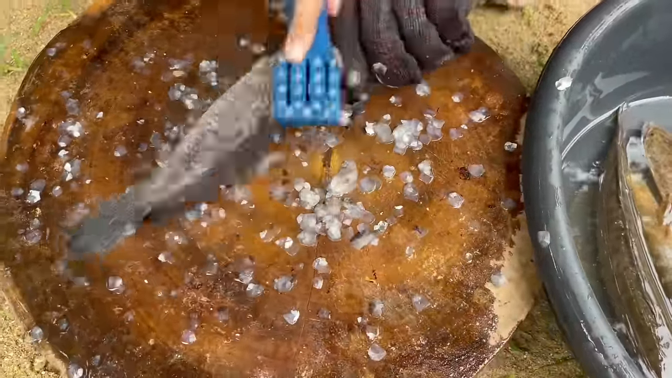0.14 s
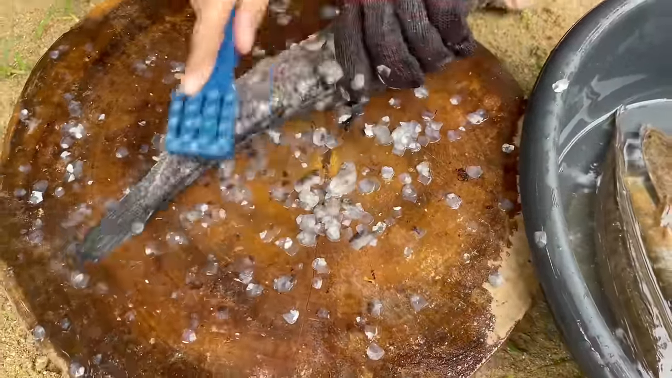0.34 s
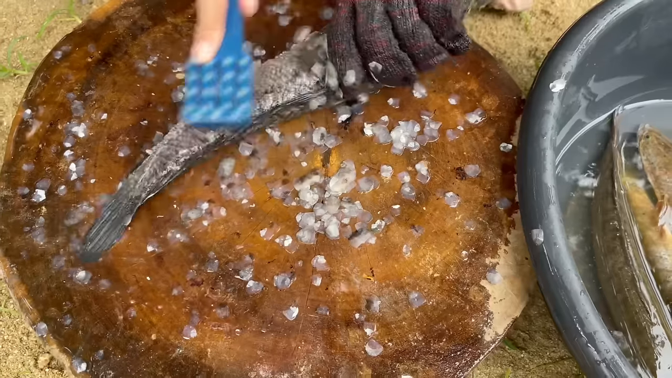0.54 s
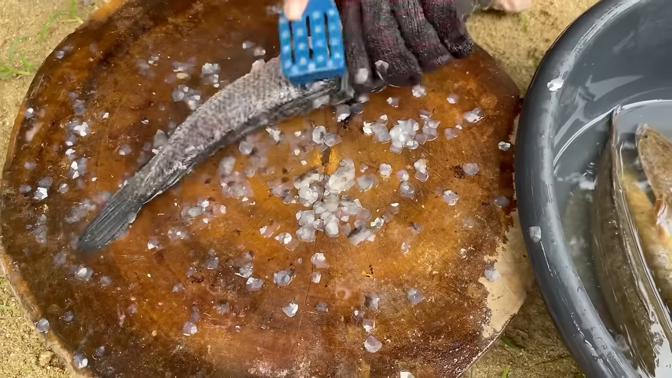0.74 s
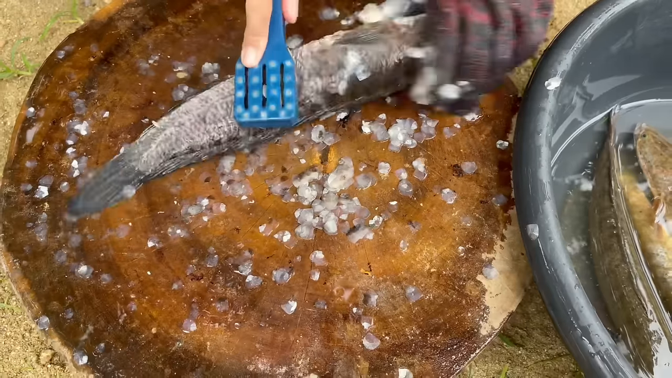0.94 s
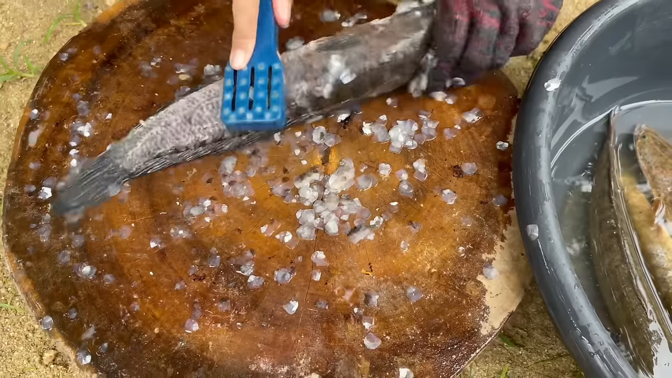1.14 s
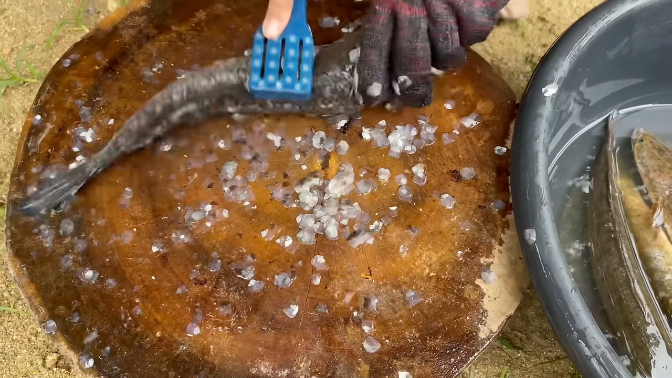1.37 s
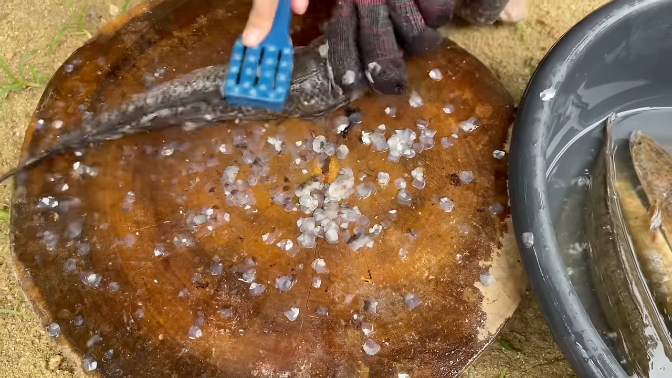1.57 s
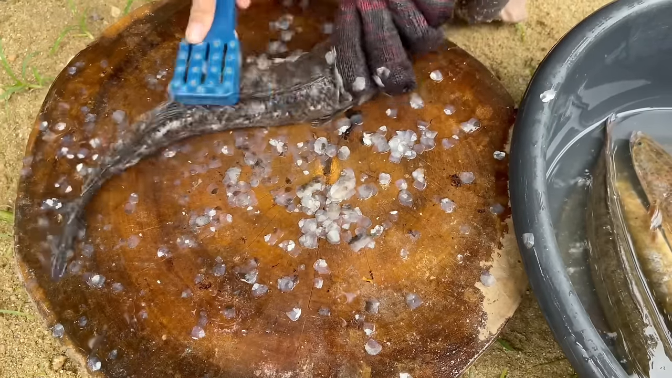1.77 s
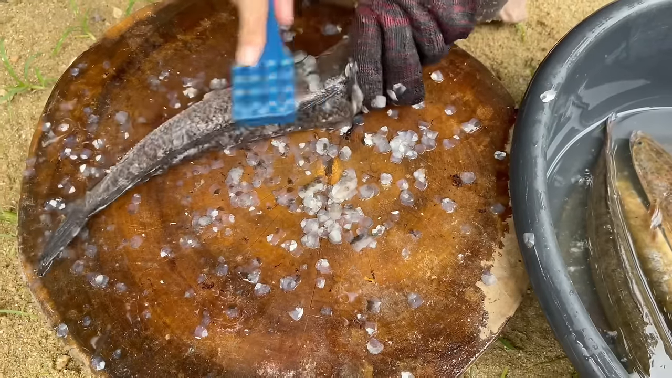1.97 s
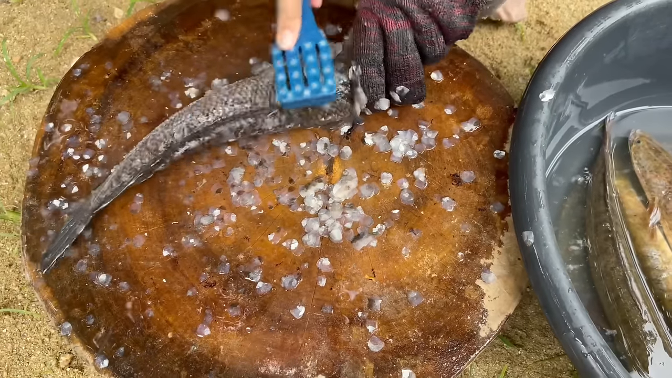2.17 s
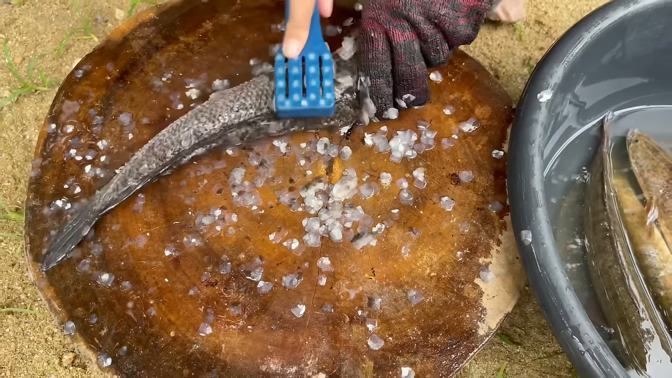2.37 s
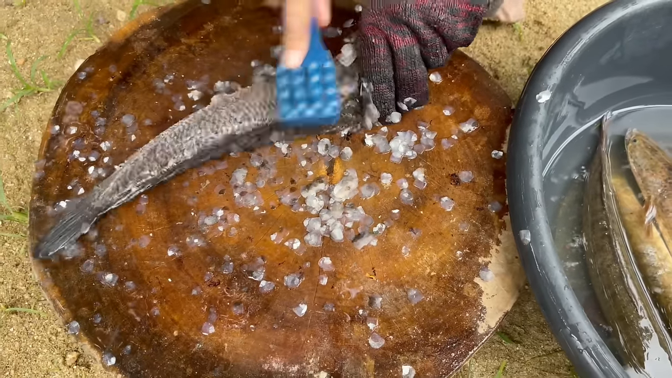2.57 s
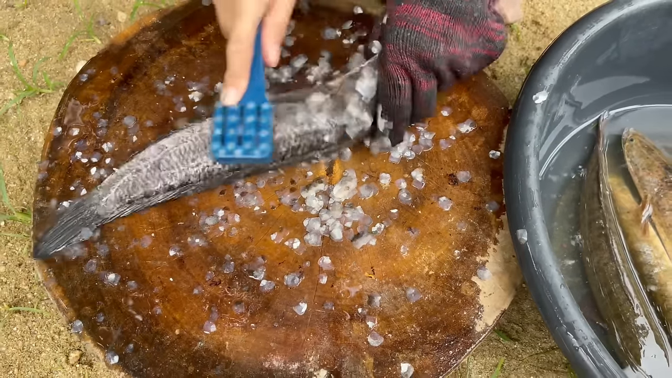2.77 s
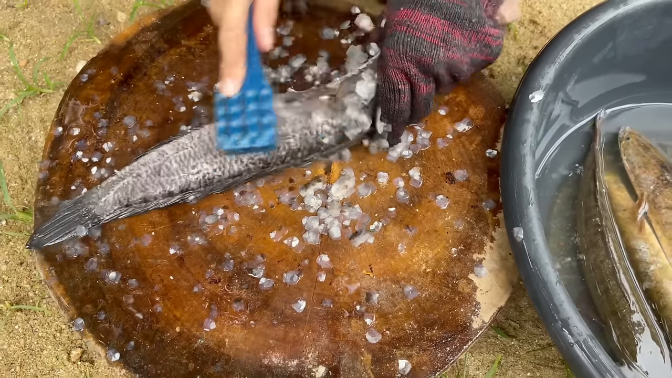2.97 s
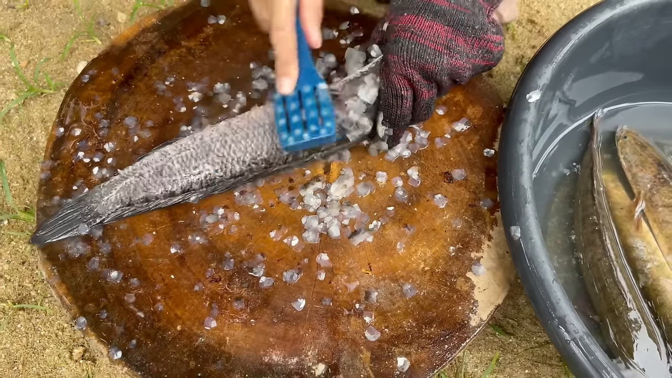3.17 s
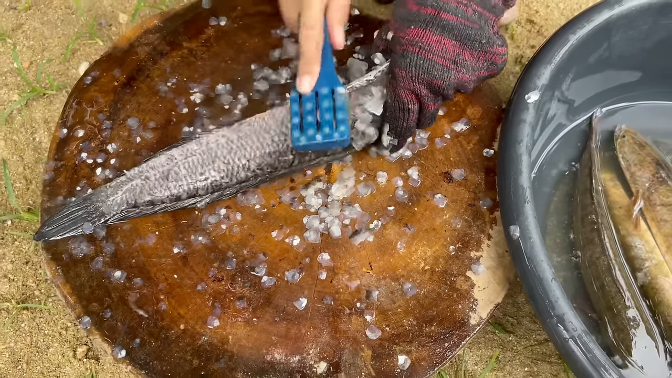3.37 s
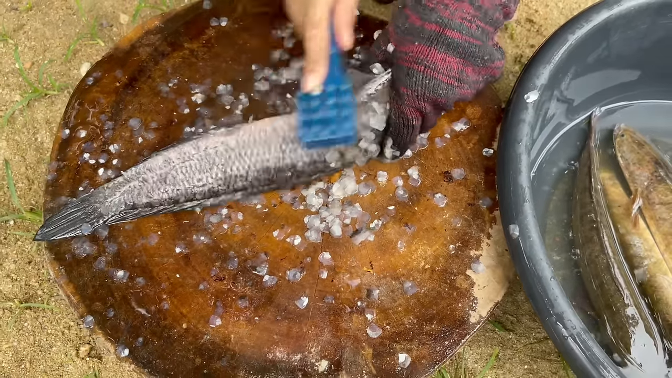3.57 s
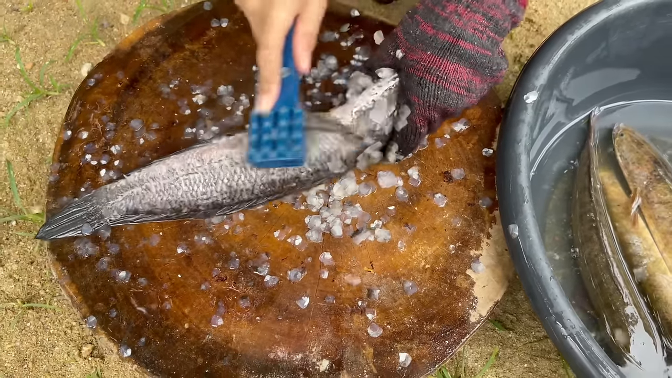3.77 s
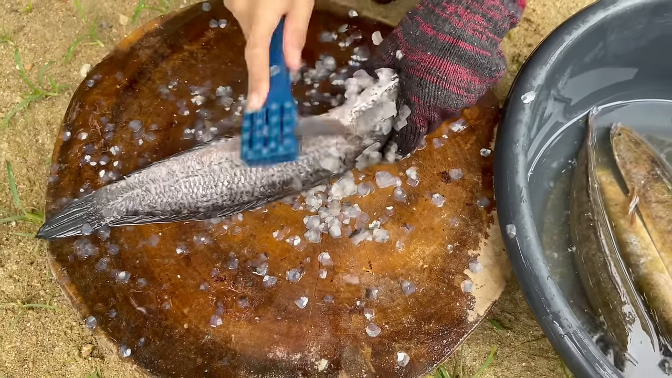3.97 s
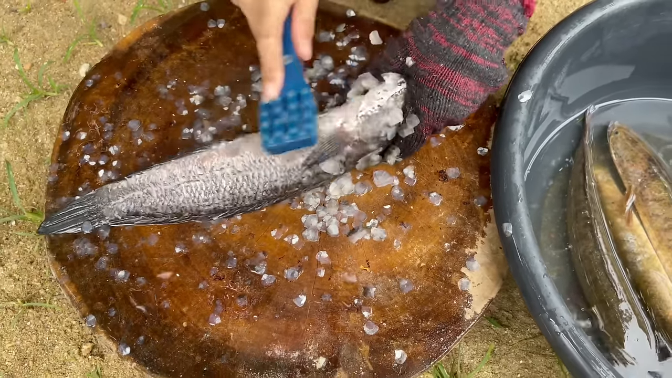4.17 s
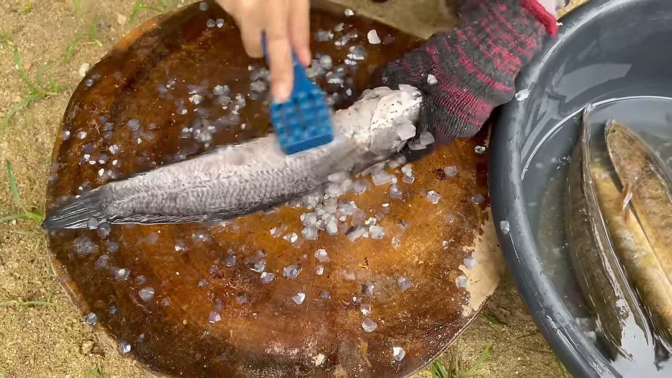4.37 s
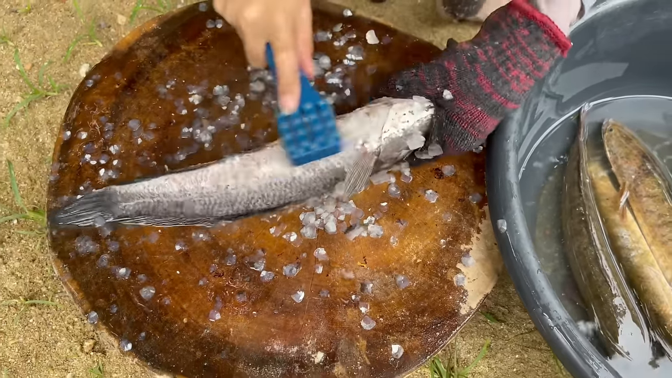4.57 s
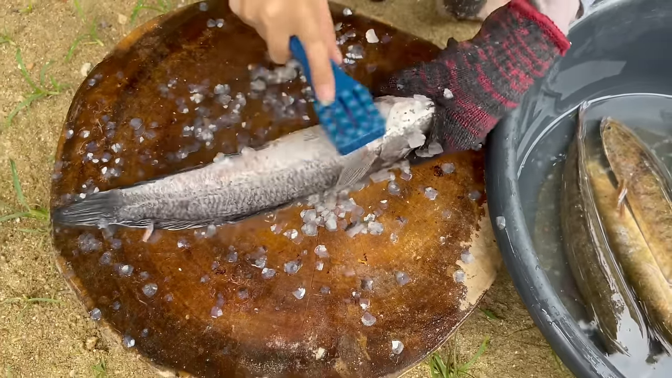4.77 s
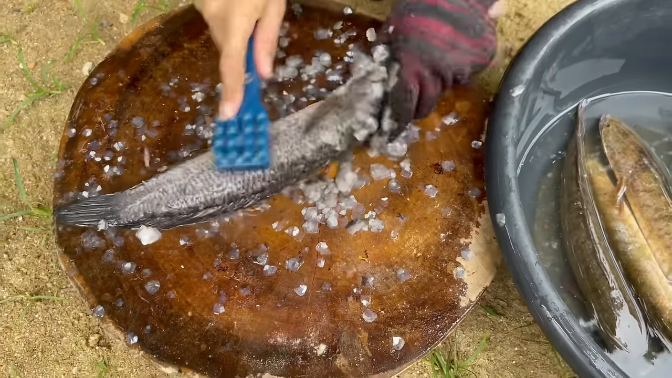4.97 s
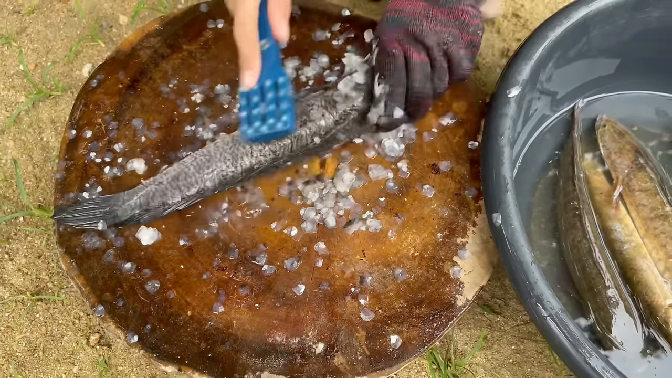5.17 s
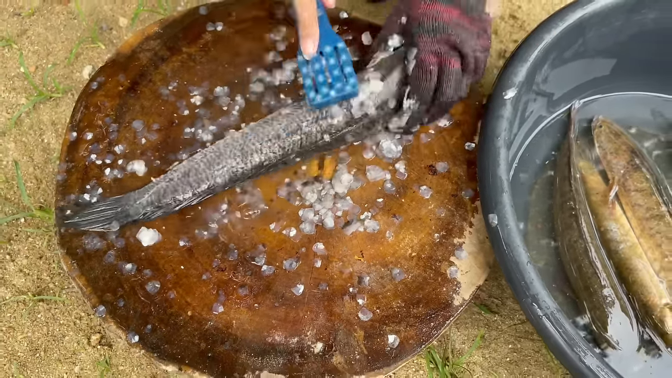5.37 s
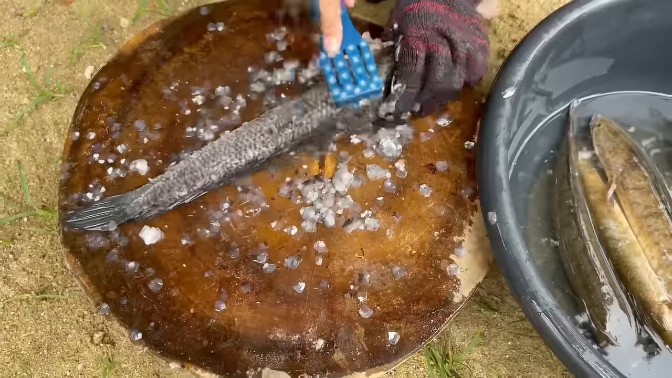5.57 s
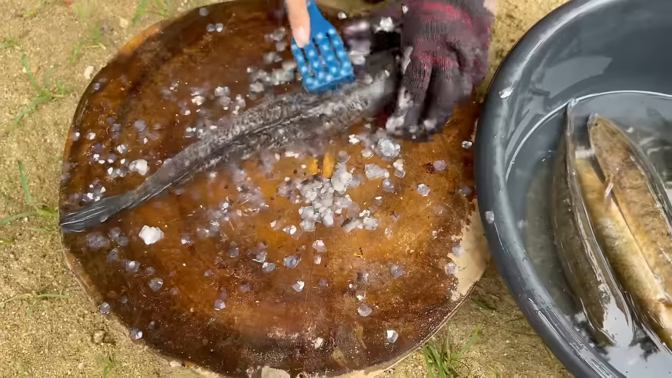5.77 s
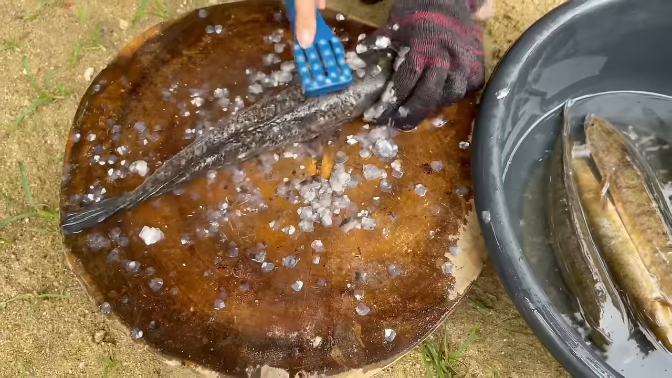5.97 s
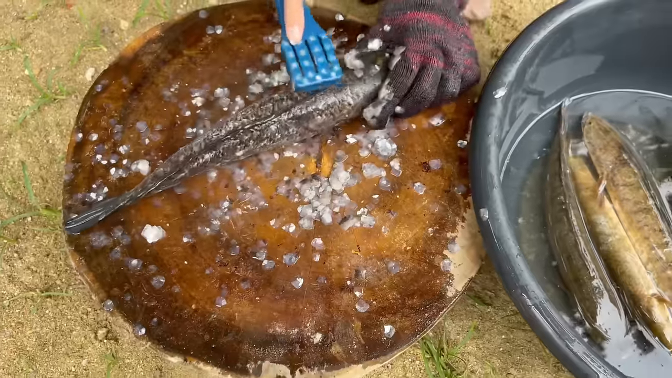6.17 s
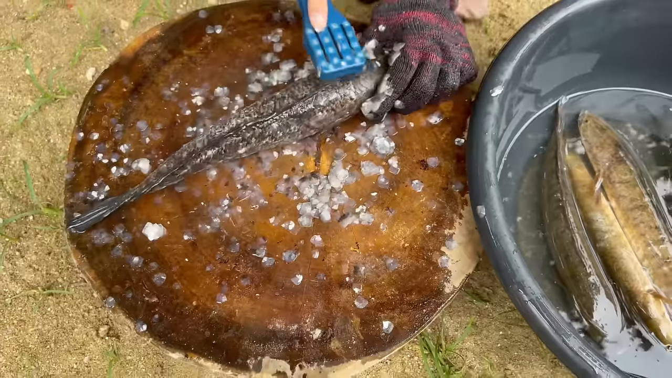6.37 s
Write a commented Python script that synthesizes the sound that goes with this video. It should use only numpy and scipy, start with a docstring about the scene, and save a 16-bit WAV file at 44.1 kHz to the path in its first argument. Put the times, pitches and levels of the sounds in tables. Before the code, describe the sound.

Close to the microphone, a plastic scaler scrapes a wet fish on a heavy wooden block in quick uneven strokes, about four hard pushes a second with lighter returns. Scales rasp, crackle and snap, the flesh thrums dully, and bits tick down. After five seconds the strokes grow softer and sparser. Insects shrill steadily in the open air over a low rumble.

```python
"""Outdoors, a plastic scaler works over a fish on a thick wooden block: hard pushes, lighter returns.
Stick-slip friction at the teeth drives coloured noise: tearing scales rasp and crackle, the fish thrums.
Stubborn scales snap in short bursts, the scaler's head pings in damped modes, loose scales tick down.
The block thuds under the strokes. Behind lie shrill insects, a low rumble and faint far-off whistles,
all made from filtered noise except the whistles, which are gliding sines."""
import sys
import numpy as np
from scipy import signal
from scipy.fft import rfft, irfft, next_fast_len
from scipy.io import wavfile
from scipy.ndimage import uniform_filter1d

SR = 44100
rng = np.random.default_rng(int(sys.argv[2]) if len(sys.argv) > 2 else 0)


def wrap_up_sound(samples):
    """Save the sound to the file named by the first command line argument, as 16-bit audio."""
    columns = np.atleast_2d(samples).T
    # keep every value between -1 and 1, then stretch to whole-number steps
    tamed = np.clip(columns, -1, 1)
    steps = np.round(tamed * 32767).astype(np.int16)
    wavfile.write(sys.argv[1], SR, steps)


N = 283563
T = np.arange(N) / SR


def amp(db):
    """Decibel law: a level becomes an amplitude gain."""
    return 10 ** (np.asarray(db) / 20)


def read(points, hz):
    """Log-frequency interpolation: every column of a table, joined by straight lines."""
    f, *columns = np.transpose(points)
    return [np.interp(np.log(hz + 1), np.log(f + 1), c) for c in columns]


def curves(rows):
    """Linear interpolation in time: every column of a table, joined by straight lines."""
    s, *columns = np.transpose(rows)
    return [np.interp(T, s, c) for c in columns]


def smooth(x, seconds):
    """Lowpass by moving average."""
    return uniform_filter1d(x, max(1, int(seconds * SR)), axis=-1)


def wander(seconds):
    """Low-frequency random modulation: twice-smoothed noise of unit spread."""
    x = smooth(smooth(rng.standard_normal(N), seconds), seconds)
    return x / x.std()


def noise():
    """Incoherent sources: two unrelated white noises."""
    return rng.standard_normal((2, N))


def clicks(per_s, spread_db):
    """Random impulses: the same moments in both drives, most small and a few large."""
    size = amp(spread_db * np.minimum(rng.exponential(1, N), 4.5))
    happens = rng.random(N) < per_s / SR
    return size * happens * noise()


def patchy(x, patch_db, width_hz, seconds):
    """Time-varying spectrum: random patches in time and frequency keep the colour shifting."""
    window, hop = 512, 128
    z = signal.stft(x, nperseg=window, noverlap=window - hop)[2]
    field = rng.standard_normal(z.shape[1:])
    for axis, span in 2 * [(0, width_hz * window / SR), (1, seconds * SR / hop)]:
        field = uniform_filter1d(field, max(1, round(span)), axis)
    gain = amp(patch_db * field / field.std())
    y = signal.istft(z * gain, nperseg=window, noverlap=window - hop)[1][:, :N]
    return y / y.std()


def steadied(x, seconds):
    """Envelope normalisation: evens out the slow level and keeps the fine grain."""
    power = smooth(smooth((x ** 2).mean(0), seconds), seconds)
    return x / np.sqrt(abs(power) + 1e-6)


def repitched(x, factor):
    """Variable-rate resampling: scales every frequency by a factor that moves in time."""
    at = np.cumsum(factor) % (N - 1)
    return np.array([np.interp(at, np.arange(N), port) for port in x])


# the two microphone ports:
# (frequency [Hz], likeness [0-1], lead of the left [rad], left over right [dB])
PORT_PAIR = [(60, .98, 0, 1.3), (500, .98, .08, 3), (1100, .92, .15, 3), (2200, .7, .2, 3),
             (3500, .78, 1.15, 3.5), (4200, .5, 1.2, 4), (4800, .3, -.5, 4.5), (5800, .7, 0, 3),
             (7100, .45, .4, .5), (8500, .96, 0, 0), (8950, .8, -.3, 0), (9500, .85, -1.9, 0),
             (10200, .98, -3.1, 0), (11650, .95, -6.1, 0), (12600, .93, -6.45, 0), (16000, .6, -6.4, 0)]


def heard(drive, spectrum):
    """Partial coherence: colours two drives and mixes them into two ports at unit rms."""
    size = next_fast_len(N, real=True)
    hz = np.fft.rfftfreq(size, 1 / SR)
    octaves_outside = abs(np.log2((hz + 1) / np.clip(hz + 1, spectrum[0][0], spectrum[-1][0])))
    colour = amp(read(spectrum, hz)[0] - 20 * octaves_outside)  # 20 dB per octave beyond the table
    a, b = rfft(drive, size) * colour
    same, lead, side_db = read(PORT_PAIR, hz)
    same = np.clip(same, 0, 1)
    right = (same * a + np.sqrt(1 - same ** 2) * b) * np.exp(-1j * lead)
    x = irfft(np.array([a * amp(side_db / 2), right * amp(-side_db / 2)]), size)[:, :N]
    return x / x.std()


def stroke(start, length, level_db, peak):
    """Pressure arch: force swells to a peak part of the way through a stroke and eases off."""
    ends_db, arch_power = -15, 2.1  # level at both ends below the peak, flatness of the top
    out = np.zeros(N)
    near = slice(max(0, int((start - length) * SR)), int((start + 2 * length) * SR))
    along, peak = (T[near] - start) / length, np.clip(peak, .1, .9)
    from_peak = np.maximum((peak - along) / peak, (along - peak) / (1 - peak))
    out[near] = amp(level_db + ends_db * from_peak ** arch_power)
    return out


# lighter return strokes:
# (start [s], length [s], relative thrum of the fish [dB], relative rasp of the scales [dB])
RETURN_STROKES = [(0, 0.058, -46, -33), (0.197, 0.075, -45.5, -30.5), (0.482, 0.061, -45.5, -34),
                  (0.823, 0.11, -44, -30.5), (1.227, 0.05, -29.5, -33.5), (1.434, 0.035, -49.5, -33.5),
                  (1.538, 0.095, -46, -28.5), (1.645, 0.091, -51, -28.5), (1.947, 0.059, -48, -30.5),
                  (2.194, 0.052, -43, -26.5), (2.428, 0.067, -39.0, -30.0), (2.734, 0.035, -39.5, -22.5),
                  (2.938, 0.063, -38.5, -30), (3.193, 0.06, -32, -25.5), (3.439, 0.077, -38.0, -30),
                  (3.681, 0.097, -31.5, -26), (3.889, 0.107, -29, -25), (4.152, 0.074, -31, -31.5),
                  (4.369, 0.073, -28.5, -30.5), (4.485, 0.064, -43, -26.5), (4.802, 0.11, -28, -28),
                  (5.62, 0.17, -51, -41), (5.855, 0.044, -45.5, -51)]


def returning(thrum_db=.5, rasp_db=-3.5):
    """Friction drive under light pressure: a return rasps first and thrums later."""
    thrum_peak, rasp_peak = 0.608, 0.2  # fractions of the stroke
    thrum = sum(stroke(s, length, db + thrum_db, thrum_peak) for s, length, db, _ in RETURN_STROKES)
    rasp = sum(stroke(s, length, db + rasp_db, rasp_peak) for s, length, _, db in RETURN_STROKES)
    return np.array([thrum, rasp])


def sagging():
    """Pitch glide: the flank thrums higher as a stroke sets in and sinks as the teeth press on."""
    sag_hz = 59.3  # slope through mid-stroke, Hz per stroke length
    offset = np.zeros(N)
    for s, length, *_ in PUSH_STROKES + RETURN_STROKES:
        near = slice(max(0, int((s - length) * SR)), int((s + 2 * length) * SR))
        along = (T[near] - s) / length - .5
        offset[near] -= sag_hz * along * np.exp(-along ** 2)
    return offset


# between strokes the scaler and the glove still brush the wet skin: (thrum [dB], rasp [dB])
SKIN_BRUSH = (-62, -47)


def effort():
    """Power addition: strokes and brushing sum to thrum and rasp amplitudes and a pitch in Hz."""
    return_hz = 599.4  # the flank thrums higher under a light return
    (push, push_hz), back = pushing(), returning()
    thrum, rasp = np.sqrt(push ** 2 + back ** 2 + amp(SKIN_BRUSH)[:, None] ** 2)
    return_share = (back[0] / thrum) ** 2
    pitch = push_hz + (return_hz - push_hz) * return_share + sagging()
    return thrum, rasp, pitch


def tearing(tears_per_s=1700, decay_s=.001):
    """Granular noise: each scale rips loose in a tiny burst, and the bursts overlap into a rasp."""
    rips = rng.exponential(1, N) * (rng.random(N) < tears_per_s / SR)
    power = signal.lfilter([1], [1, -np.exp(-2 / (decay_s * SR))], rips)
    return np.sqrt(power) * noise()


# the patch being worked:
# (time [s], firmness [0 soft flank - 1 bony back], crispness: crackle over rasp [dB])
WORKED_PATCH = [(.1, 0.99, -1.5), (.4, 0.71, 1.5), (.7, 0.92, 2), (1.3, 0.32, -1), (1.85, 0.78, -1.5),
                (2.2, 0.67, 3.5), (2.6, 0.46, -3), (3.1, 0.051, 2), (3.33, 0.25, -3), (3.6, 0.17, -1),
                (3.85, 0.39, 3), (4.05, .02, 1.5), (4.3, .02, 2.5), (4.62, 0.27, 2.5), (5.02, 0.035, -0.5),
                (5.3, 0.27, 3.5), (5.6, 0.098, 2), (6.3, 0.75, 0)]
# the belly rings hollow when the scaler presses on it: (time [s], level relative to the thrum [dB])
BELLY_RING = [(2.4, -35), (3.1, -10), (4.3, -19), (4.85, -21), (5.02, -9), (5.31, -4.5), (5.7, -2)]
# colour of the soft flank before repitching: (frequency [Hz], relative level [dB per Hz])
FLANK_COLOUR = [(60, -61), (140, -24.5), (300, -21), (390, -12), (460, 1.5), (520, 0.5), (600, -4),
                (700, -11), (850, -18.5), (1100, -26), (1450, -32), (1900, -29), (2600, -25.5), (5000, -61)]
# colour of the bony back: (frequency [Hz], relative level [dB per Hz])
BACK_COLOUR = [(70, -28), (140, -14), (240, -11.5), (310, -8), (390, -9), (510, -2.5), (600, 0),
               (690, -3.5), (790, -3), (880, -3.5), (1050, -15), (1200, -20.5), (1550, -18.5), (1950, -26),
               (2500, -25), (3300, -26), (5400, -11), (7000, -31)]
# colour of the hollow ring: (frequency [Hz], relative level [dB per Hz])
HOLLOW_COLOUR = [(1400, -7), (1750, 1), (1950, 9), (2150, -9), (2450, -9), (3000, -30), (3450, 11),
                 (3800, 6.5), (4100, 6.5), (4700, -31)]
# colour of the rasp at the teeth: (frequency [Hz], relative level [dB per Hz])
RASP_COLOUR = [(300, -18), (900, -3), (1600, -11), (2500, -4.5), (3100, -1), (3550, 4), (4300, 2),
               (5500, 4), (7000, 1.5), (9000, -7), (12000, -53), (16000, -48)]
# colour of the crackling scales: (frequency [Hz], relative level [dB per Hz])
CRACKLE_COLOUR = [(2500, -74), (5000, -58), (7000, -9.5), (8100, 4), (9000, 5), (10000, 8.5), (10800, 10),
                  (11500, 8.5), (12200, -1), (13100, -11), (14300, -47), (15500, -11), (16200, -45)]


def scraping(thrum, rasp, pitch, thrum_db=0, rasp_db=-3, crackle_db=1, catch_db=-0.06):
    """Stick-slip friction: the same slight catches modulate the tearing scales and the fish."""
    flank_hz = 520  # pitch of the flank colour as tabled
    firm, crisp_db = curves(WORKED_PATCH)
    firm = np.clip(firm, 0, 1)
    catches = amp(catch_db * 2 * np.tanh(wander(0.0062) / 2))  # a tooth can hold only so much
    tears = catches * patchy(tearing(), patch_db=2.0, width_hz=520, seconds=.009)
    tugs = patchy(clicks(per_s=3000, spread_db=0.57), patch_db=3.5, width_hz=170, seconds=.02)
    tugs = np.sqrt(catches) * tugs  # the soft flesh evens the catches out
    flank = repitched(heard(tugs, FLANK_COLOUR), pitch / flank_hz)
    fish = steadied((1 - firm) * flank + firm * heard(tugs, BACK_COLOUR), 0.015)
    belly = amp(curves(BELLY_RING)[0]) * steadied(heard(tugs, HOLLOW_COLOUR), 0.018)
    teeth = amp(rasp_db - crisp_db / 2) * steadied(heard(tears, RASP_COLOUR), 0.027)
    scales = amp(crackle_db + crisp_db / 2) * steadied(heard(tears, CRACKLE_COLOUR), 0.033)
    return amp(thrum_db) * thrum * (fish + belly) + rasp * (teeth + scales)


def flakes(rasp, level_db=-47):
    """Random impacts: loose wet scales tick as they land, more strongly just after a strong rasp."""
    shed = signal.lfilter([1], [1, -np.exp(-1 / (.18 * SR))], rasp)  # fades over 0.18 s
    landing = clicks(per_s=150, spread_db=7.5) * (1 + shed / shed.mean())
    t = T[:400]
    splat = rng.standard_normal(len(t)) * np.exp(-t / 0.0041)
    ticks = signal.oaconvolve(landing, splat[None], axes=1)[:, :N]
    return amp(level_db) * heard(ticks, CRACKLE_COLOUR)


# the block rocks on the ground: (start [s], length [s], peak level [dB])
BLOCK_ROCKINGS = [(2.836, 0.076, -44), (3.609, 0.11, -37), (4.101, 0.13, -39.5)]
# colour of its thud: (frequency [Hz], relative level [dB per Hz])
THUD_COLOUR = [(25, -35), (45, -16), (62, 2.5), (110, -23), (170, -13), (300, -40), (600, -70)]


def block(rasp, level_db=-20, settle=0.045):
    """Inertia of a heavy mass: it thuds softly, following the strokes smoothed over settle seconds."""
    keep = np.exp(-1 / (settle * SR))
    push = signal.lfilter([1 - keep], [1, -keep], rasp)
    rocking = sum(stroke(s, length, db, 0.39) for s, length, db in BLOCK_ROCKINGS)
    return (amp(level_db) * push + rocking) * steadied(heard(noise(), THUD_COLOUR), 0.021)


# calls of the nearest insect: (start [s], end [s], level [dB])
INSECT_CALLS = [(0.46, 1.093, -39.5), (1.683, 2.229, -41.5), (2.945, 3.5, -45), (4.193, 4.522, -42),
                (4.913, 5.33, -41.5), (5.695, 6.141, -38.5)]
# colour of the distant chorus: (frequency [Hz], relative level [dB per Hz])
CHORUS_COLOUR = [(5000, -39), (5900, -32), (6350, -21), (6850, -11.5), (7500, -16.5), (8200, -20),
                 (9000, -24), (9800, -107), (11100, -38), (12300, -35), (13200, -53)]
# colour of the nearest insect: (frequency [Hz], relative level [dB per Hz])
SHRILL_COLOUR = [(5600, -50), (6050, -18), (6220, -4), (6330, -28), (6440, 0), (6560, -8), (7000, -42)]


def insects(chorus_db=-41, waver_db=2.36, fade_s=0.027):
    """Narrow-band noise: an unbroken, wavering distant chorus, and a nearer insect shrilling in calls."""
    calls = sum(amp(db) * np.clip(np.minimum(T - start, end - T) / fade_s, 0, 1)
                for start, end, db in INSECT_CALLS)
    chorus = amp(chorus_db + waver_db * wander(0.019)) * heard(noise(), CHORUS_COLOUR)
    return chorus + calls * heard(noise(), SHRILL_COLOUR)


# colour of the open air: (frequency [Hz], relative level [dB per Hz])
AIR_COLOUR = [(15, -52), (30, -41), (48, -1.5), (62, 0), (80, 0), (105, -0.5), (150, -9.5), (220, -10.5),
              (330, -18), (700, -24), (1250, -25), (2400, -26.5), (3800, -29), (5500, -53), (12000, -67),
              (16000, -62)]


def air(level_db=-45, swell_db=1):
    """Ambient noise: a low outdoor rumble with a thin, drifting wash of far-off sound."""
    drift = patchy(noise(), patch_db=2.0, width_hz=200, seconds=0.16)
    return amp(level_db + swell_db * wander(0.57)) * steadied(heard(drift, AIR_COLOUR), 0.17)


# pushes against the lay of the scales: (start [s], length [s], relative thrum of the fish [dB],
# relative rasp of the scales [dB], place of the rasp peak [0-1 of the stroke], flank pitch mid-push [Hz])
PUSH_STROKES = [(0.089, 0.064, -17.5, -18.5, 0.53, 550.5), (0.341, 0.097, -17, -20.5, 0.54, 541.7),
                (0.633, 0.076, -15, -18.5, 0.44, 556.7), (1.28, 0.11, -39, -26, 0.4, 533),
                (1.823, 0.053, -32, -23, 0.5, 552.6), (1.878, 0.053, -63, -22.5, 0.26, 557),
                (2.056, 0.084, -29, -16.5, 0.5, 560), (2.304, 0.059, -26.5, -17.5, 0.38, 558),
                (2.533, 0.081, -24.5, -16.5, 0.64, 562.3), (2.786, 0.11, -27, -19, 0.47, 510.8),
                (3.041, 0.066, -19, -15, 0.98, 513.6), (3.284, 0.061, -22.5, -19.5, 0.78, 509.7),
                (3.533, 0.0582, -18.5, -17, 0.65, 542.3), (3.796, 0.043, -25, -21.5, 0.7, 565),
                (3.842, 0.033, -29, -20, 0.65, 563.5), (4.019, 0.05, -22.5, -25, 0.22, 545),
                (4.254, 0.05134, -24, -30.5, 0.24, 528), (4.556, .1, -29.5, -32, 0.21, 562),
                (4.966, 0.11, -25, -27, 0.42, 523), (5.257, .12, -33, -34.5, 0.4, 521.5),
                (5.559, 0.041, -40.5, -24.5, 0.01, 538.2), (5.971, 0.033, -41, -32.5, 0.18, 550),
                (6.254, 0.04, -45, -26, 0, 534), (6.364, 0.02, -47.5, -30.5, 0.6, 550)]


def pushing(thrum_db=1, rasp_db=0):
    """Friction drive under hard pressure: thrum and rasp amplitudes, and the flank's pitch in Hz."""
    thrum_peak = 0.343  # a push thrums early
    thrum = sum(stroke(s, length, db + thrum_db, thrum_peak) for s, length, db, _, _, _ in PUSH_STROKES)
    rasp = sum(stroke(s, length, db + rasp_db, peak) for s, length, _, db, peak, _ in PUSH_STROKES)
    pitch = curves([(s + length / 2, hz) for s, length, *_, hz in PUSH_STROKES])[0]
    return np.array([thrum, rasp]), pitch


# stubborn scales letting go: (time [s], relative knock on the fish [dB],
# relative clack of the tooth [dB], relative crack of the scale [dB])
SCALE_SNAPS = [(0.09, -35, -37, -17.5), (0.101, -24, -24, -9), (0.1421, -6.5, -5.5, -2),
               (0.158, -46, -23, -23), (0.345, -37, -34, -15), (0.427, -27, -25, -9),
               (0.44, -31, -13.5, -6), (0.449, -23.5, -21, -11), (0.628, -33, -26.5, -29),
               (0.6948, -26, -14, -8), (0.7033, -12.5, -11, -1), (1.214, -32, -46, -46),
               (1.259, -34, -27, -22), (1.301, -24, -26, -23), (1.313, -26, -31, -24),
               (1.3163, -14, -8.5, -4.5), (1.323, -31, -27, -23), (1.347, -46, -42, -21),
               (1.3633, -28, -19, -13.5), (1.389, -28.5, -23, -22), (1.558, -30.5, -43, -27),
               (1.693, -49, -24, -19), (1.742, -30, -20, -19), (1.8562, -21.5, -22.5, -3),
               (1.888, -42, -20, -20), (1.9052, -20, -13, -13), (1.979, -51, -34, -19),
               (2.133, -14, -9.5, -6.5), (2.137, -18, -15.5, -13), (2.322, -20, -15, -18),
               (2.445, -34, -37, -21.5), (2.579, -12, -22.5, -10), (2.601, -17, -12, -3.5),
               (2.6122, -13.5, -9, -5), (2.6711, -35, -28, -20.5), (2.8075, -20.5, -12.5, -7.5),
               (2.82, -36, -32, -11), (2.834, -36, -22, -19), (2.842, -15, -10, -14),
               (2.849, -16.5, -10, -5), (3.0422, -35, -23, -21), (3.092, -14, -4, 0),
               (3.098, -21, -11, -6.5), (3.103, -30, -5, -13), (3.1912, -35, -34, -18),
               (3.333, -22, -12.5, -6.5), (3.34, -27, -15.5, -19), (3.431, -41, -25.5, -36),
               (3.449, -42, -33.5, -25), (3.462, -36, -42, -21), (3.5897, -13, -11, -1.5),
               (3.6, -13, -12, -7.5), (3.606, -10, -5, -10), (3.6326, -18.5, -14.5, -9),
               (3.6894, -22.5, -31, -7.5), (3.699, -34, -32, -13), (3.8586, -14, -27.5, -24),
               (3.951, -33, -25.5, -20), (4.0215, -26, -27, -25), (4.053, -29.5, -24, -15),
               (4.06, -21, -10.5, -14.5), (4.1174, -58, -40, -26), (4.173, -48.5, -36, -19),
               (4.178, -39, -27.5, -18), (4.29, -25, -29, -16.5), (4.347, -55, -45, -27),
               (4.49, -39, -45, -39), (4.766, -41, -30, -26), (4.8026, -46, -28, -19),
               (4.815, -36, -37, -20), (4.988, -22.5, -23.5, -31), (5.155, -32.5, -37, -42),
               (5.282, -39, -23, -36), (5.3065, -41, -27.5, -21.5), (5.332, -35, -34, -22),
               (5.481, -37.5, -53, -52), (5.571, -31, -18, -13), (5.979, -42, -32.5, -15.5),
               (6.058, -32, -42, -43), (6.0636, -39, -35, -23), (6.2595, -35, -26, -25.5),
               (6.38, -34, -22.5, -30)]
# colour of the knock on the fish: (frequency [Hz], relative level [dB per Hz])
KNOCK_COLOUR = [(250, -3), (450, -7.5), (750, 5.5), (1200, -1), (1700, -5), (2300, -4.5), (3500, -54)]
# colour of the clack of a plastic tooth: (frequency [Hz], relative level [dB per Hz])
CLACK_COLOUR = [(1500, -37), (2400, -12.5), (3100, 4.5), (3700, 6), (4400, 4.5), (5400, 4), (7000, -1.5),
                (12000, -60)]


def snapping(knock_db=-5, clack_db=-5.0, crack_db=-2.0, flutter_db=-12, edge_db=-12):
    """Transient excitation: a scale snaps in a short burst with soft edges, then flutters briefly."""
    rise, decay, flutter, edge = 0.00062, .0023, .007, 0.006  # s
    lead = 256  # samples before the snap sets in
    t = T[:2200] - T[lead]
    snap = np.exp(-(np.maximum(t - rise, 0) / decay) ** 2)
    shape = np.clip(t / rise, 0, 1) * (snap + amp(flutter_db) * np.exp(-t / flutter))
    shape = shape + amp(edge_db) * np.exp(-abs(t) / edge)
    blows = np.zeros((3, N))
    for s, *levels_db in SCALE_SNAPS:
        blows[:, round(s * SR) - lead] = amp(levels_db)
    knock, clack, crack = signal.oaconvolve(blows, shape[None], axes=1)[:, :N]
    burst = patchy(noise(), patch_db=6.5, width_hz=700, seconds=.02)  # each snap has its own colour
    fish = amp(knock_db) * knock * steadied(heard(burst, KNOCK_COLOUR), 0.0059)
    tooth = amp(clack_db) * clack * steadied(heard(burst, CLACK_COLOUR), 0.0028)
    scale = amp(crack_db) * crack * steadied(heard(burst, CRACKLE_COLOUR), 0.005)
    return fish + tooth + scale


# a plastic tooth springs free and pings: (time [s], level [dB], pitch relative to the head modes [ratio])
TOOTH_PINGS = [(0.21, -37.5, 1.13), (3.099, -17, 0.96), (3.689, -24.5, 1.03), (3.704, -29.5, .98),
               (3.862, -21, 1.02), (4.062, -33, 0.94)]
# modes of the scaler's head: (frequency at ratio 1 [Hz], level relative to the ping [dB], t60 [s])
HEAD_MODES = [(3440, 9.5, 0.036), (3570, 0, 0.041), (3960, -8, 0.02), (6370, 0, 0.032)]


def pinging(right_lag=1.05):
    """Modal ringing: the head sounds as damped sines; the right port lags in phase (radians)."""
    t = T[:5000]
    x = np.zeros(N, complex)
    for s, level_db, pitch in TOOTH_PINGS:
        ring = sum(amp(level_db + db - 60 * t / t60) * np.exp(2j * np.pi * hz * pitch * t)
                   for hz, db, t60 in HEAD_MODES)
        x[round(s * SR):][:len(t)] += ring
    return np.array([x, x * np.exp(-1j * right_lag)]).imag


# faint far-off swells: (centre [s], Gaussian length [s], level [dB])
FAR_SWELLS = [(1.046, 0.19, -50), (5.78, 0.18, -53.5), (6.097, 0.11, -51.5)]
# colour of the swells: (frequency [Hz], relative level [dB per Hz])
FAR_COLOUR = [(950, -4), (1280, 5), (1500, -3), (1750, -4), (2200, -9.5)]
# thin far-off whistles: (centre [s], Gaussian length [s], pitch at centre [Hz], glide [Hz/s], level [dB])
FAR_WHISTLES = [(0.965, .06, 1235, 793, -55), (1.609, .035, 1600, 506, -50), (6.2, 0.071, 1710, 700, -56)]


def far_off():
    """Gaussian envelopes: indistinct noise swells now and then, and thin sines glide upward."""
    level = sum(amp(db) * np.exp(-((T - s) / length) ** 2) for s, length, db in FAR_SWELLS)
    whistles = np.zeros(N)
    for s, length, hz, glide, db in FAR_WHISTLES:
        t = T - s
        tone = np.sin(2 * np.pi * (hz + glide * t / 2) * t)
        whistles += amp(db) * np.exp(-(t / length) ** 2) * tone
    return level * heard(noise(), FAR_COLOUR) + whistles


def yard(x, wet_db=-23, t60=.22):
    """Diffuse scattering: weak, short echoes from the ground, the basin and things nearby."""
    t = T[:SR // 3]
    tail = rng.standard_normal((2, len(t))) * amp(-60 * t / t60) * (t > .004)
    scatter = signal.oaconvolve(x, tail / np.linalg.norm(tail[0]), axes=1)[:, :N]
    return x + amp(wet_db) * scatter


def scene():
    """Superposition: strokes drive the scraping, flakes and block; the outdoors lies behind."""
    thrum, rasp, pitch = effort()
    close = scraping(thrum, rasp, pitch) + snapping() + pinging() + flakes(rasp)
    return yard(close) + block(rasp) + insects() + far_off() + air()


def record(dry):
    """Saturation and band limit: the strongest peaks overload smoothly, then a lowpass acts."""
    limited = dry / (1 + dry ** 8) ** (1 / 8)
    lowpass = signal.firwin(255, 15900, fs=SR)  # cutoff in Hz
    return signal.oaconvolve(limited, lowpass[None], "same")


dry = scene()
out = record(dry)
wrap_up_sound(out)
```